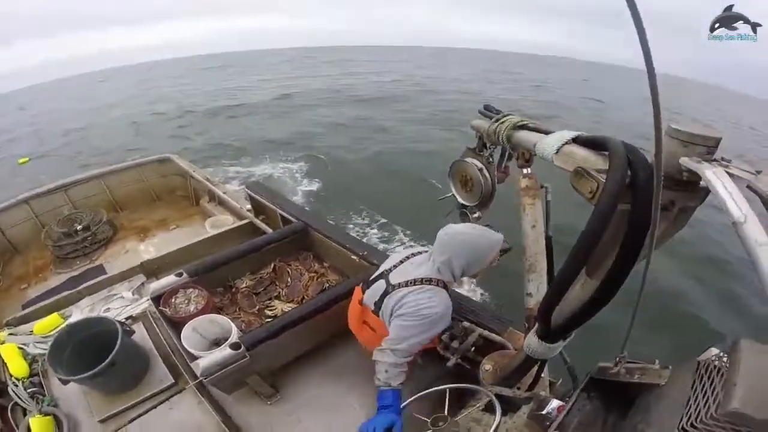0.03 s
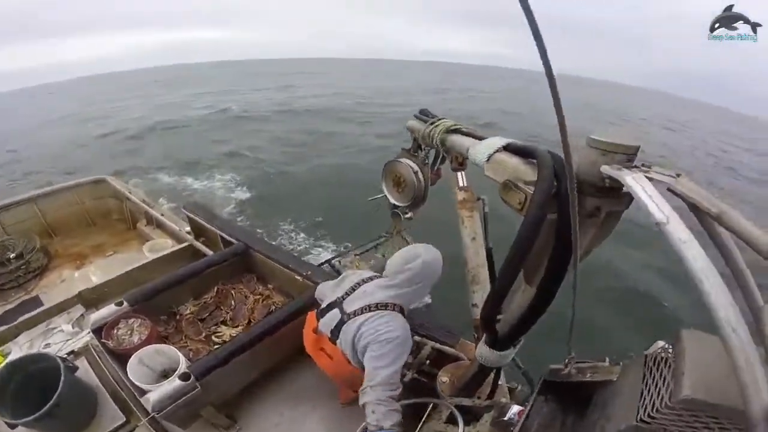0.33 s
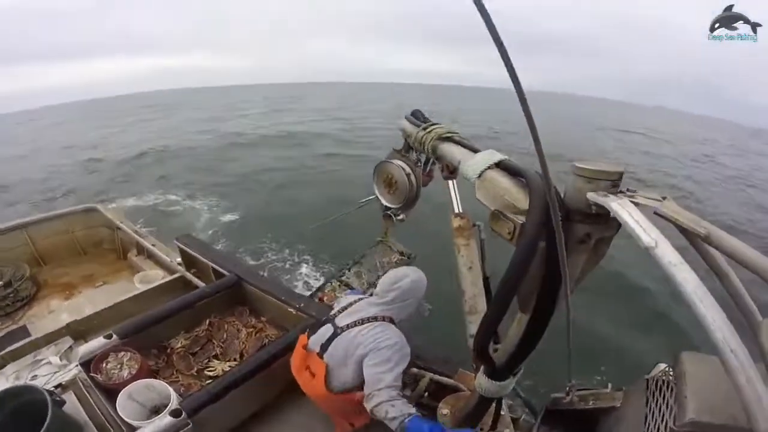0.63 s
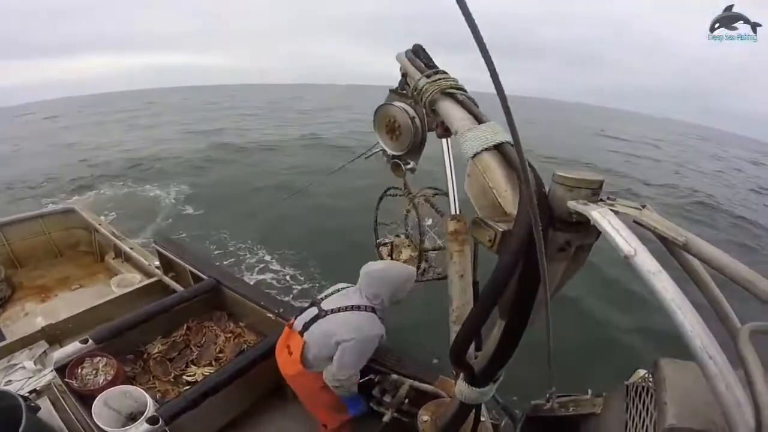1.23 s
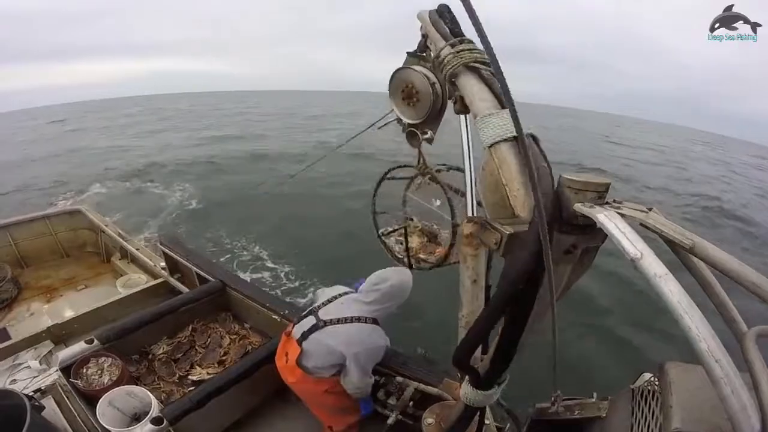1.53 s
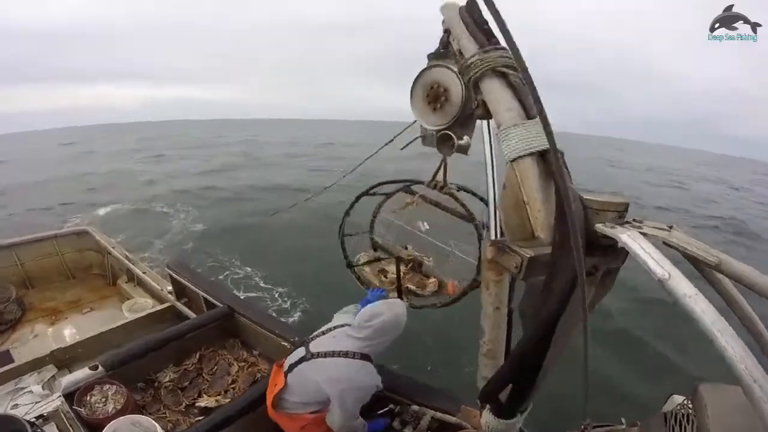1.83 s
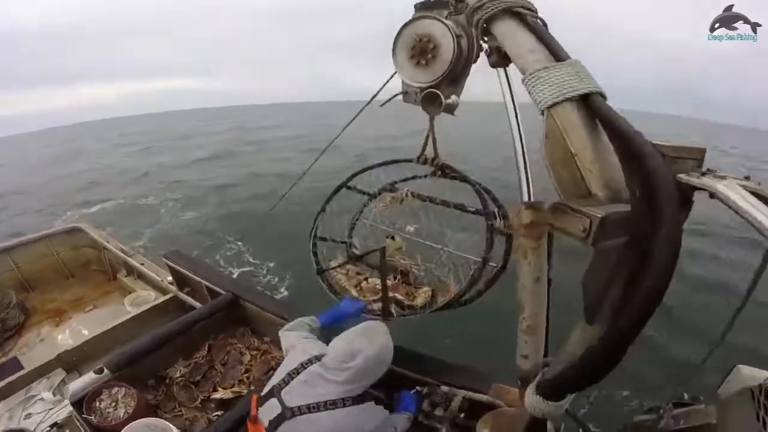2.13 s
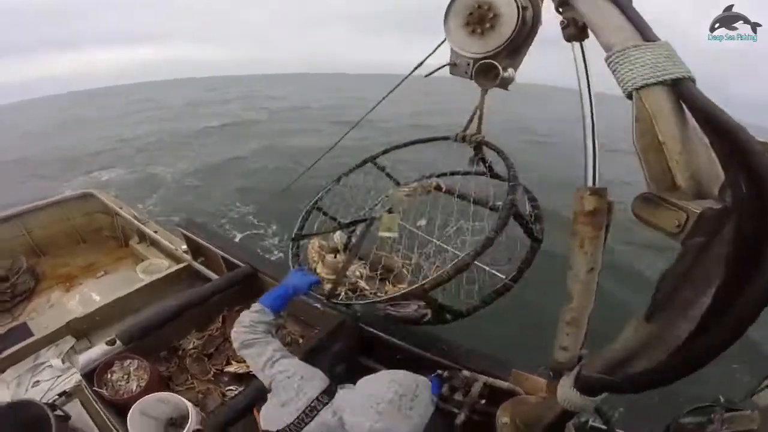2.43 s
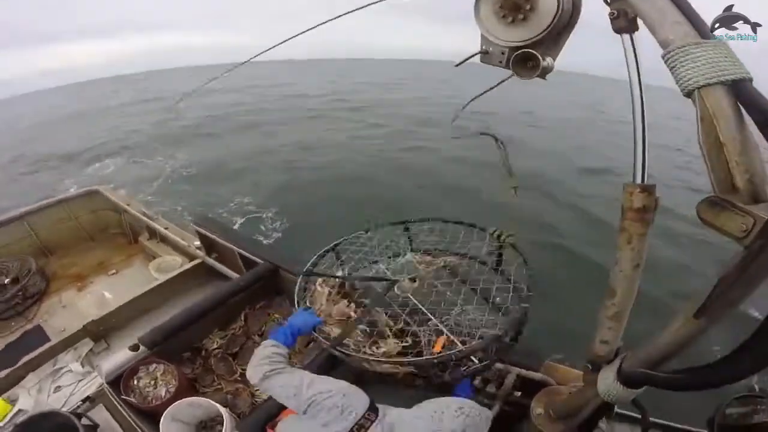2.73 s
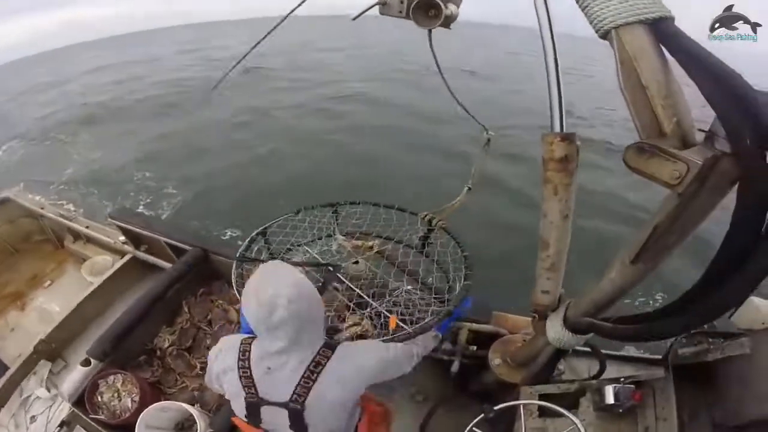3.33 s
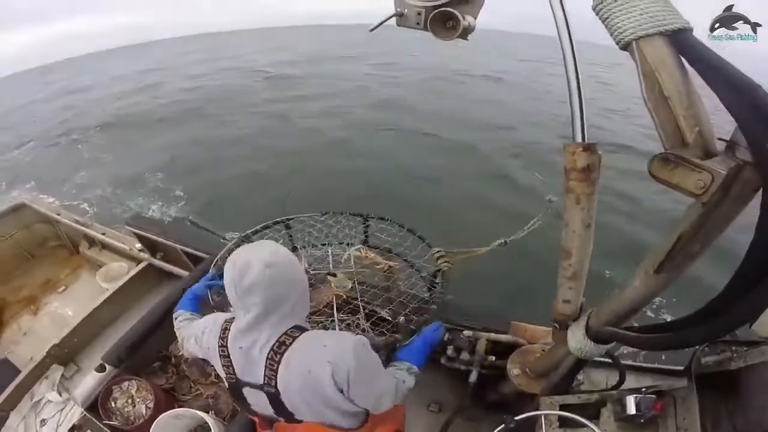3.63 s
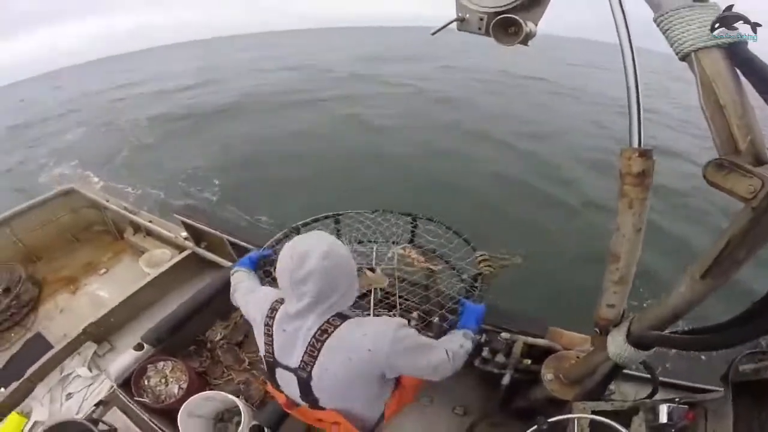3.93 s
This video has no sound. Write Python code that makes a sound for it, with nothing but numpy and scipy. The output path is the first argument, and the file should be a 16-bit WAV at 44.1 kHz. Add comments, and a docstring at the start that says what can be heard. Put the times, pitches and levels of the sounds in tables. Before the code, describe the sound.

A steel crab pot clatters aboard over a throbbing boat engine, sea wash and light wind on the microphone. Rope squeaks and a low shudder come first, then clanking tackle, a scrape and thump on the rail, and rattling mesh.

```python
"""A crab pot is hauled aboard a fishing boat over a throbbing six-cylinder diesel, sea wash and wind.
First the wet line chirps in the hissing hauler, then the loaded boom shudders with the engine.
Near two seconds the hull knocks and the tackle clatters and grinds against the block.
The steel pot then strikes the rail, scrapes over it and lands with a thump near three seconds;
its mesh and catch rattle on, and a few wires ping."""
import sys
import numpy as np
from scipy import signal
from scipy.fft import rfft, irfft
from scipy.io import wavfile

SR = 44100
rng = np.random.default_rng(int(sys.argv[2]) if len(sys.argv) > 2 else 0)


def inscribe(sig):
    """Save sig as 16-bit PCM at rate SR to the path in sys.argv[1].

    A 1-D sig is mono; a 2-D sig holds one channel per row.
    Samples are clipped to [-1, 1] before scaling.
    """
    pcm = np.round(np.clip(np.atleast_2d(sig).T, -1, 1) * 32767)
    wavfile.write(sys.argv[1], SR, pcm.astype(np.int16))


N = 176400
T = np.arange(N) / SR
RING_T = T[:SR // 2]
CYLINDERS, CUTOFF_HZ = 6, 15700
# tone of the block's dense ring (frequency [Hz], relative level [dB])
BLOCK_TONE = [(200, 4), (600, -10.5), (1100, -12), (2000, -4), (2400, -4.5), (2800, -9.5), (5100, -18),
              (6000, -19.5), (7500, -16), (10500, -26.5), (15000, -47)]


def amp(db):
    """Decibels to gain."""
    return 10 ** (np.asarray(db) / 20)


def unit(x):
    """Scales to rms 1."""
    return x / np.sqrt(np.mean(x ** 2) + 1e-20)


def level(points):
    """Fader ride through (time [s], level [dB]); muted beyond any end point in mid-scene."""
    s, db = np.transpose(points)
    before = db[0] if s[0] < .5 else -120
    after = db[-1] if s[-1] > 3.5 else -120
    return amp(np.interp(T, s, db, left=before, right=after))


def add(mix, s, sound):
    """Mixes a sound in at time s."""
    part = mix[max(round(s * SR), 0):][:len(sound)]
    part += sound[:len(part)]


def colour(x, points):
    """Minimum-phase EQ through (frequency [Hz], gain [dB])."""
    f, db = np.transpose(points)
    hz = abs(np.fft.fftfreq(8192, 1 / SR))
    log_gain = np.log(amp(np.interp(np.log(hz + 1), np.log(f), db)))
    taps = np.fft.ifft(np.exp(np.conj(signal.hilbert(log_gain)))).real[:4096]
    return signal.fftconvolve(x, taps)[:len(x)]


def patchy(x, depth_db, patch_hz=500):
    """Random EQ: each point of contact favours other parts of the spectrum."""
    hz = np.fft.rfftfreq(len(x), 1 / SR)[1::20]
    db = np.interp(hz, np.arange(200) * patch_hz, depth_db * rng.standard_normal(200))
    return colour(x, np.transpose([hz, db]))


def drift(rate_hz):
    """Slow random wander of rms 1."""
    lowpass = np.exp(-(np.fft.rfftfreq(N, 1 / SR) / rate_hz) ** 2)
    return unit(irfft(rfft(rng.standard_normal(N)) * lowpass, N))


def attack(rise_s):
    """Softened onset."""
    return 1 - np.exp(-RING_T / rise_s)


def fade(t60):
    """Decay of 60 dB in t60 seconds."""
    return np.exp(-np.log(1000) * RING_T / t60)


def burst(t60):
    """Dying noise: a dense ring with no pitch."""
    return rng.standard_normal(len(RING_T)) * fade(t60)


def ring(modes):
    """Dying sines from (frequency [Hz], level [dB], t60 [s])."""
    return sum(amp(db) * fade(t60) * np.sin(2 * np.pi * hz * RING_T) for hz, db, t60 in modes)


def grains(per_s, spread_db):
    """Random tiny contacts of uneven size."""
    sizes = amp(spread_db * np.minimum(rng.exponential(1, N), 4))
    return sizes * rng.choice([-1, 1], N) * (rng.random(N) < per_s / SR)


def cycles(zero_s=1.46):
    """Engine cycles counted from zero_s; each cylinder fires once a cycle."""
    # engine speed (time [s], firing rate [Hz])
    speed = [(0, 57), (1.6, 64.7), (2.4, 62.5), (4, 62.7)]
    turns = np.cumsum(np.interp(T, *np.transpose(speed))) / SR / CYLINDERS
    return turns - np.interp(zero_s, T, turns)


def engine(waver=0.12):
    """Diesel firing harmonics; uneven cylinders add neighbouring partials that throb once a cycle."""
    # engine partials (multiple of the cycle rate, level [dB])
    orders = [(6, -36), (9, -49), (12, -45), (17, -41), (18, -41), (23, -49), (24, -51), (29, -53),
              (30, -50), (42, -58)]
    # engine load (time [s], gain [dB])
    load = [(1.5, -1), (2.4, -3.5)]
    turns, phases = cycles(), rng.random(20)
    drone = np.zeros(N)
    for order, db in orders:
        phase = order * turns + phases[round(order / CYLINDERS)]
        drone += amp(db) * (1 + waver * drift(2.7)) * np.cos(2 * np.pi * phase)
    return np.sqrt(2) * amp(np.interp(T, *np.transpose(load))) * drone


def wash(pulse_depth=0.14, swell_db=.5, splash=0.33, plates_db=-5):
    """A bed of sea and machinery noise, pulsing with each firing and ringing in the deck plates."""
    # tone of the bed (frequency [Hz], relative level [dB])
    tone = [(50, -36), (120, -1.5), (260, -1.5), (470, -11.5), (760, -11.5), (1000, -21), (2200, -13.5),
            (2700, -22.5), (4200, -26), (10500, -26.5), (15000, -49)]
    # fader of the bed (time [s], level [dB])
    fader = [(0, -38.5), (4, -40)]
    pulse = 1 + pulse_depth * np.cos(2 * np.pi * CYLINDERS * cycles())
    hiss = rng.standard_normal(N) * pulse + splash * unit(grains(900, 9.5))
    plates = irfft(rfft(hiss) * rfft(burst(t60=0.1), N), N)
    bed = colour(unit(hiss) + amp(plates_db) * unit(plates), tone)
    return level(fader) * amp(swell_db * drift(7)) * unit(bed)


def hauler():
    """Oil hisses through the hauler's valve."""
    # hydraulic flow (time [s], level [dB])
    fader = [(0, -61), (2.4, -54), (4, -68)]
    # bright valve hiss (frequency [Hz], relative level [dB])
    tone = [(2000, -5), (3700, -2.5), (5400, -0.5), (8000, 3), (10400, 0.5), (15000, -23)]
    return level(fader) * unit(colour(rng.standard_normal(N), tone))


def wind():
    """Gusts buffet the microphone."""
    # gust strength (time [s], level [dB])
    gusts = [(0, -16), (.15, -36.5), (.4, -25), (.85, -31), (1.7, -34), (4, -37)]
    # low rumble (frequency [Hz], relative level [dB])
    tone = [(6, -15), (23, 0.5), (40, -7.5), (90, -14.5), (500, -55)]
    return level(gusts) * unit(colour(rng.standard_normal(N), tone))


def line(width_hz=600, slips_per_s=1200):
    """Wet rope slips in the hauler in short, rough chirps."""
    # rope chirps (time [s], length [s], level [dB], pitch [Hz])
    chirps = [(0, 0.074, -40, 2170), (0.277, 0.06, -39.5, 2040), (0.348, 0.017, -41, 2700),
              (0.381, 0.058, -42.5, 2590), (0.444, 0.024, -39.5, 2520), (0.484, 0.037, -42.5, 2530),
              (0.593, 0.035, -40.5, 2530), (0.658, .018, -42, 2580), (0.707, 0.021, -43.5, 2620),
              (0.836, 0.075, -45, 2480), (.937, 0.013, -45.5, 2670)]
    out = np.zeros(N)
    for s, length, db, hz in chirps:
        t = np.arange(0, length, 1 / SR)
        slips = grains(slips_per_s, 1.9)[:len(t)]
        resonance = RING_T * np.exp(-np.pi * width_hz * RING_T) * np.sin(2 * np.pi * hz * RING_T)
        chirp = signal.fftconvolve(slips, resonance)[:len(t)]
        add(out, s, amp(db) * unit(chirp) * np.sin(np.pi * t / length))
    return out


def thud(hz, t60, rise_s):
    """One heavily damped mode with a soft edge."""
    return ring([(hz, 0, t60)]) * attack(rise_s)


def shudder(uneven_db=1):
    """The loaded boom thuds in step with the firings."""
    # strength of the shudder (time [s], level [dB])
    fader = [(.92, -29), (1.05, -14), (1.155, -9.5), (1.178, -25), (1.205, -10), (1.29, -11.5),
             (1.305, -60)]
    firings = np.floor(CYLINDERS * cycles() + .04 * drift(40))
    beats = (np.diff(firings, append=0) == 1) * amp(uneven_db * drift(40))
    return level(fader) * signal.fftconvolve(beats, thud(hz=195, t60=.02, rise_s=.0011))[:N]


def hull():
    """Knocks from the boom carry through the hull."""
    # dull knocks (time [s], level [dB], pitch [Hz], t60 [s])
    knocks = [(1.731, -10.5, 190, 0.028), (1.881, -9, 137.6, 0.063), (1.908, -5, 158, 0.035),
              (1.919, -6.5, 46.8, 0.127), (2.903, -14.5, 150, 0.064)]
    out = np.zeros(N)
    for s, db, hz, t60 in knocks:
        add(out, s, -amp(db) * thud(hz, t60, rise_s=0.00026))
    return out


def grind(contacts_per_s=700):
    """The tackle grinds between its blows: small contacts keep the block ringing."""
    # strength of the grinding (time [s], level [dB])
    fader = [(1.875, -33), (1.905, -23.5), (2.01, -25.5), (2.03, -34.5), (2.17, -33.5), (2.24, -47)]
    steel = burst(t60=0.069)
    grinding = signal.fftconvolve(grains(contacts_per_s, 1.1), steel)[:N]
    return level(fader) * unit(colour(grinding, BLOCK_TONE))


def strikes(hits, modes, tone, modes_db, modes_t60, lead_db, lead_t60,
            rise_s, short_t60, tail_db, tail_t60, patchy_db):
    """Each blow on steel starts a dense ring and leaves its modes singing under one lead note."""
    out = np.zeros(N)
    for s, db, lead_hz in hits:
        steel = rng.standard_normal(len(RING_T)) * (fade(short_t60) + amp(tail_db) * fade(tail_t60))
        dense = colour(patchy(steel * attack(rise_s), patchy_db), tone)
        shares = rng.choice([-1, 1], len(modes)) * amp(rng.standard_normal(len(modes)))
        singing = sum(share * ring([(*mode, modes_t60)]) for share, mode in zip(shares, modes))
        lead = ring([(lead_hz, lead_db, lead_t60)])
        add(out, s, amp(db) * (.05 * unit(dense) + amp(modes_db) * singing + lead))
    return out


def tackle():
    """The tackle clatters against the steel block."""
    # clanks (time [s], gain [dB], lead note [Hz])
    clanks = [(1.895, -12, 1830), (1.9067, -12.5, 3070), (1.922, -9, 2250), (1.931, -21.5, 2100),
              (1.9526, -8.5, 2020), (1.97, -17, 2310), (1.9925, -12, 2265), (2.0414, -16, 2295),
              (2.052, -19, 2330), (2.0743, -15, 1980), (2.196, -26, 2390)]
    # modes of the block (frequency [Hz], relative level [dB])
    modes = [(1658, -10), (1859, -3), (2140, -7), (2246, -5), (2340, -6), (2430, -8), (3440, -14)]
    return strikes(clanks, modes, BLOCK_TONE, modes_db=-15, modes_t60=0.14, lead_db=-8, lead_t60=0.052,
                   rise_s=0.0014, short_t60=0.04, tail_db=-16.5, tail_t60=0.52, patchy_db=0.8)


def ticks(peak_db=10, peak_octaves=0.095, slope_db=5):
    """Light contacts of shackle, wire and shell: quick cracks with one resonance and a dull top."""
    # sharp ticks (time [s], level [dB], resonance [Hz])
    contacts = [(1.9068, -18.5, 5000), (1.969, -32, 7500), (1.978, -23, 7540), (2.0505, -25, 7500),
                (2.067, -35, 4130), (2.1326, -31, 4030), (2.1556, -29.5, 4000), (2.635, -26, 7200),
                (2.685, -43, 7100), (2.975, -24.5, 4900), (3.0126, -26, 5000), (3.031, -23, 8350),
                (3.163, -33, 2360), (3.218, -25.5, 8800), (3.355, -39.5, 3430), (3.429, -34, 8100),
                (3.686, -39, 7560), (3.835, -36, 3030)]
    out, hz = np.zeros(N), np.geomspace(200, CUTOFF_HZ, 100)
    top_cut_db = 30 * np.maximum(np.log2(hz / 10000), 0)
    for s, db, peak_hz in contacts:
        octaves = abs(np.log2(hz / peak_hz))
        eq_db = peak_db * np.exp(-(octaves / peak_octaves) ** 2) - slope_db * octaves - top_cut_db
        crack = unit(colour(rng.standard_normal(len(RING_T)), np.transpose([hz, eq_db])))
        add(out, s, amp(db) * fade(0.068) * attack(0.001) * crack)
    return out


def pings(damp_s=.006):
    """Single bars and wires ring until a touch stills them."""
    # ringing wires (time [s], pitch [Hz], level [dB], t60 [s], time until damped [s])
    wires = [(1.953, 1859, -14, .12, .2), (2.76, 6185, -40, .55, .4), (3.629, 3630, -37.5, .42, .041),
             (3.689, 3644, -44.5, .54, .4)]
    out = np.zeros(N)
    for s, hz, db, t60, free_s in wires:
        gate = np.clip((free_s - RING_T) / damp_s + 1, 0, 1)
        add(out, s, ring([(hz, db, t60)]) * gate)
    return out


def pot():
    """The pot's steel frame bangs against the rail."""
    # blows (time [s], gain [dB], lead note [Hz])
    blows = [(2.683, -12.5, 2320), (2.7305, -19, 1650), (2.9046, -20, 3410), (2.9745, -10, 1635),
             (3.0123, -24.5, 2370), (3.034, -21.5, 2390)]
    # modes of the frame (frequency [Hz], relative level [dB])
    modes = [(1870, -3), (2370, -7), (3410, -3.5)]
    # the frame's dense ring (frequency [Hz], relative level [dB])
    tone = [(200, 7.5), (700, 2), (1150, -4), (2200, 1.5), (4500, -8), (8000, -4), (11000, -9.5),
            (15000, -32)]
    return strikes(blows, modes, tone, modes_db=-17.5, modes_t60=0.12, lead_db=-10, lead_t60=0.055,
                   rise_s=0.00049, short_t60=0.038, tail_db=3, tail_t60=0.27, patchy_db=2.0)


def scrape(slips_per_s=1400):
    """The frame squeals over the rail in a stream of tiny slips."""
    # swell of the scrape (time [s], level [dB])
    fader = [(2.745, -55), (2.768, -29), (2.787, -25.5), (2.81, -24), (2.825, -38), (2.89, -49.5)]
    # steel squeal (frequency [Hz], relative level [dB])
    tone = [(1000, -17.5), (2500, -17), (2900, -0.5), (3300, 2.5), (3850, -8), (4900, -19), (7400, -11.5),
            (9900, -15.5), (15000, -37)]
    slips = signal.fftconvolve(grains(slips_per_s, 1.6), burst(t60=.02))[:N]
    return level(fader) * unit(colour(slips, tone))


def rattle(spots=20, contacts_per_s=90):
    """Crabs and mesh rustle at many spots, each ticking with its own colour."""
    # stirring of mesh and catch (time [s], level [dB])
    fader = [(2.89, -42), (2.91, -29.5), (2.96, -34), (3.02, -32.5), (3.08, -43), (3.23, -36), (3.3, -46.5),
             (3.55, -49.5), (3.68, -44), (4, -47.5)]
    # crisp rustle (frequency [Hz], relative level [dB])
    tone = [(300, -13), (2300, -3.5), (5000, -6.5), (8300, 3.5), (11000, -3.5), (15000, -12.5)]
    rustle = np.zeros(N)
    for _ in range(spots):
        contacts = grains(contacts_per_s, 3.5)
        tick = patchy(burst(t60=.025), depth_db=2)
        rustle += signal.fftconvolve(contacts, tick)[:N]
    return level(fader) * unit(colour(rustle, tone))


def landing(at_s=2.98):
    """The rail booms as it takes the pot's weight."""
    # low modes of the rail (frequency [Hz], relative level [dB], t60 [s])
    modes = [(150, -22, 0.27), (192, -10.5, 0.11), (316.4, -13, 0.11), (546, -19.5, 0.066)]
    out = np.zeros(N)
    add(out, at_s, 2 * ring(modes) * attack(0.0078))
    return out


def scene():
    """The mono deck mix: steel hits, background bed, the haul and the pot coming aboard."""
    hits = tackle() + pot()
    bed = engine() + wash() + hauler() + wind()
    haul = shudder() + line() + hull() + grind() + ticks() + pings()
    aboard = scrape() + rattle() + landing()
    return (hits + bed + haul + aboard)[None]


def record(dry):
    """The microphone's housing colours the treble, and a steep low-pass trims the top."""
    # housing resonances (frequency [Hz], gain [dB])
    housing = [(4600, 0.5), (5800, -8), (6600, -9.5), (7450, -4), (8400, -12.5), (10000, -9)]
    lowpass = signal.firwin(511, CUTOFF_HZ, window=("kaiser", 9), fs=SR)
    return signal.oaconvolve(colour(dry[0], housing), lowpass, "same")[None]


dry = scene()
out = record(dry)
inscribe(out)
```